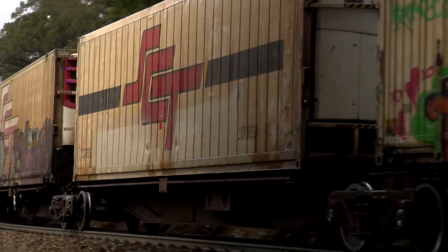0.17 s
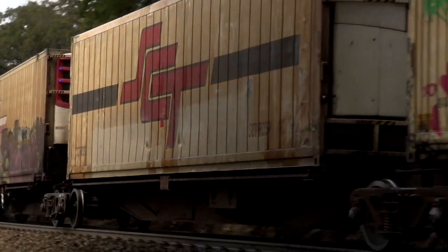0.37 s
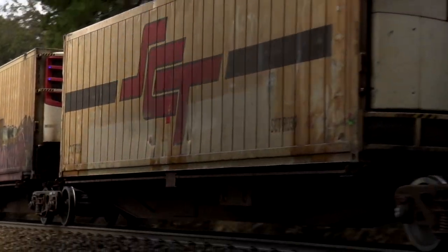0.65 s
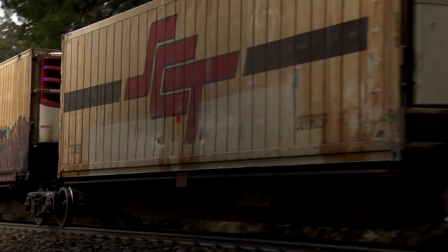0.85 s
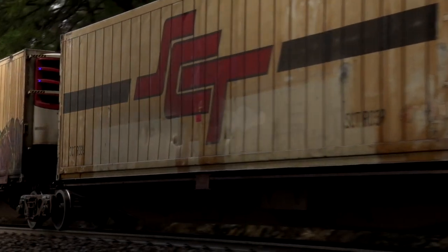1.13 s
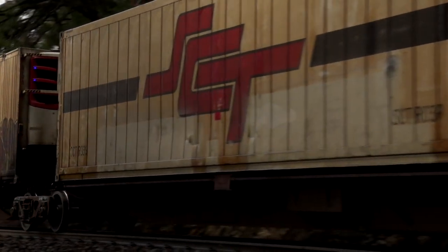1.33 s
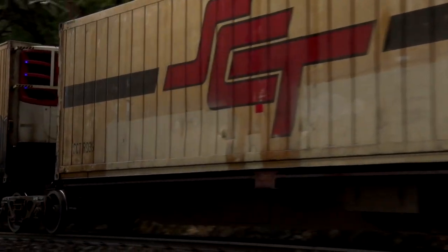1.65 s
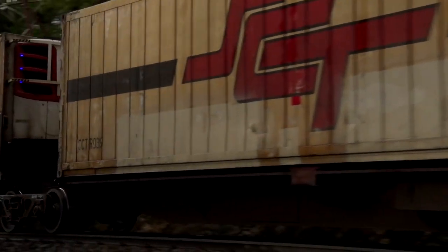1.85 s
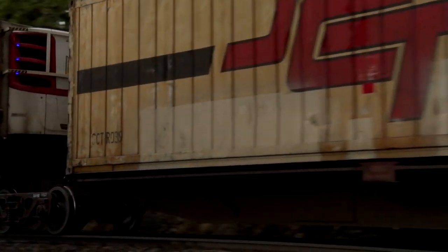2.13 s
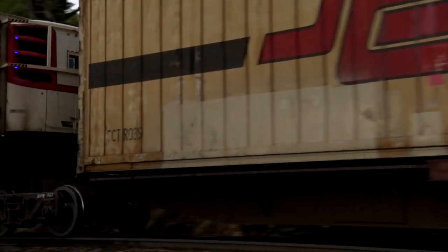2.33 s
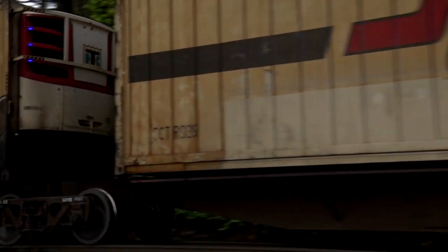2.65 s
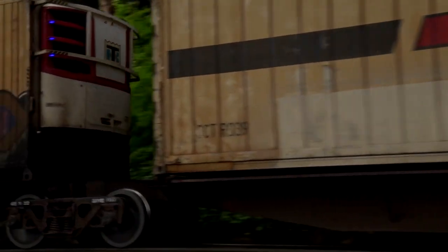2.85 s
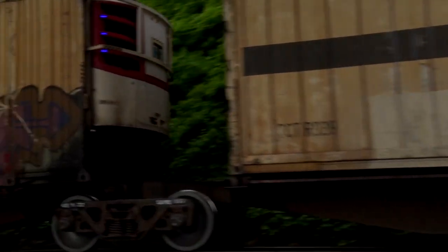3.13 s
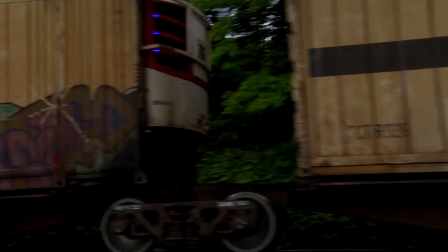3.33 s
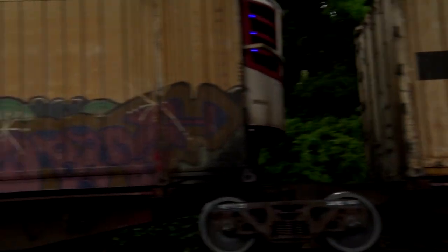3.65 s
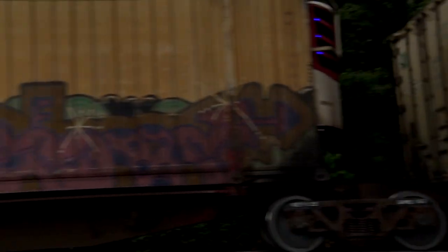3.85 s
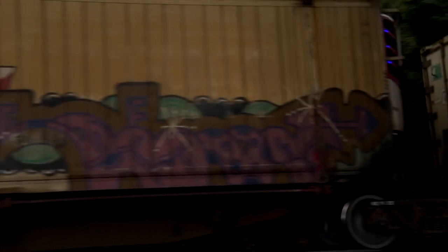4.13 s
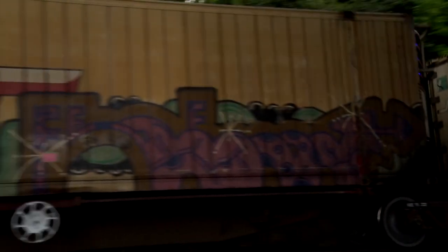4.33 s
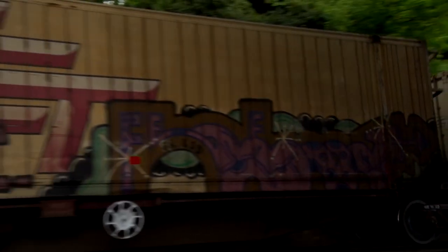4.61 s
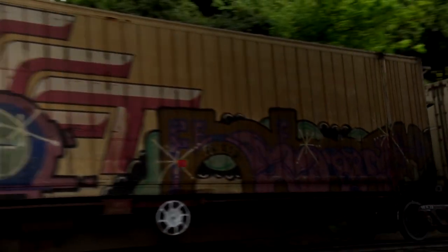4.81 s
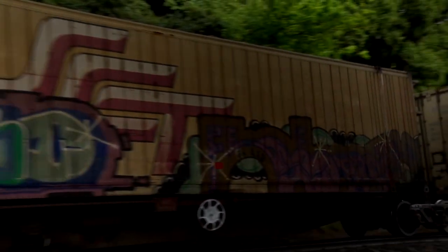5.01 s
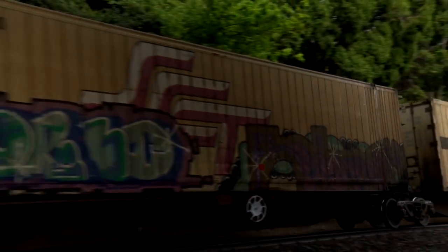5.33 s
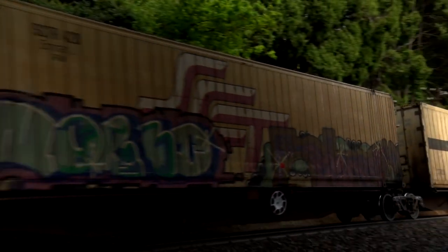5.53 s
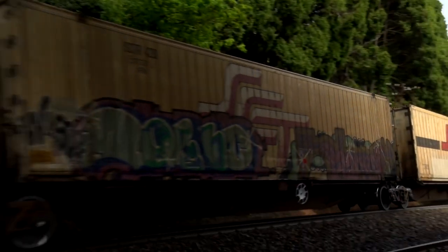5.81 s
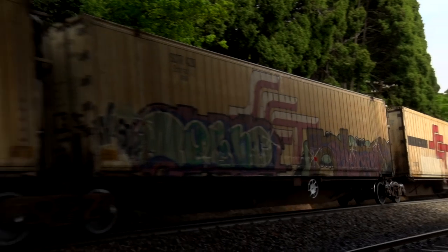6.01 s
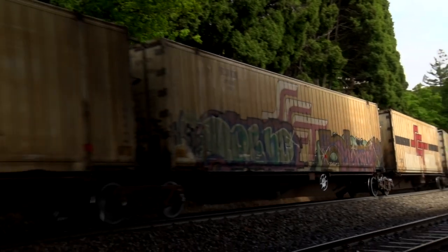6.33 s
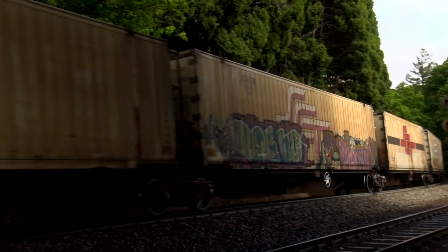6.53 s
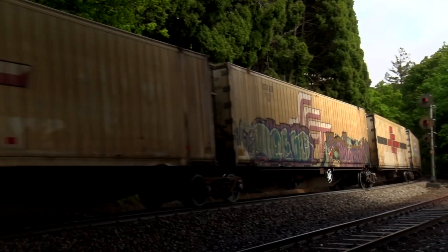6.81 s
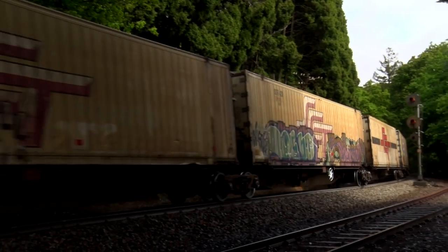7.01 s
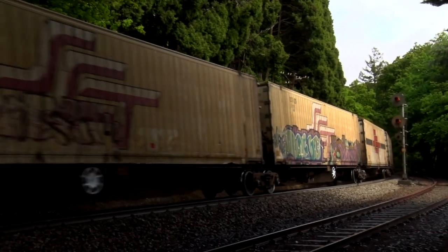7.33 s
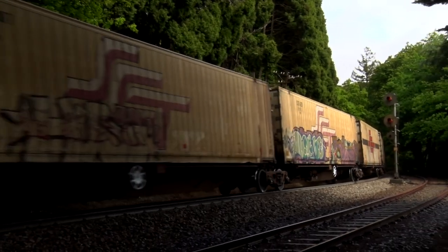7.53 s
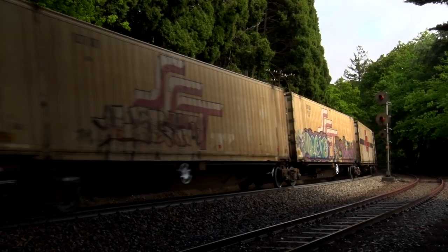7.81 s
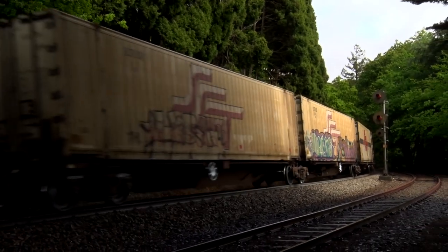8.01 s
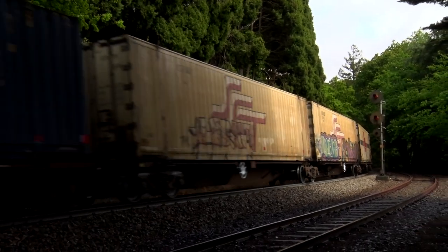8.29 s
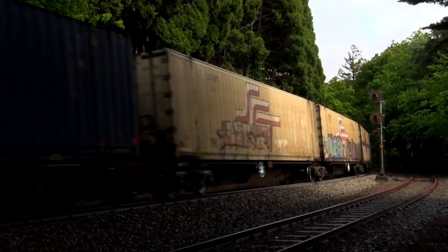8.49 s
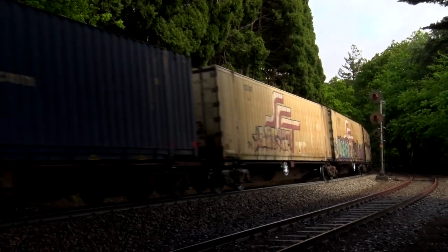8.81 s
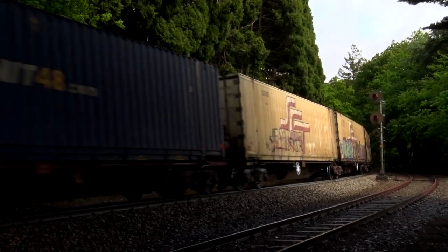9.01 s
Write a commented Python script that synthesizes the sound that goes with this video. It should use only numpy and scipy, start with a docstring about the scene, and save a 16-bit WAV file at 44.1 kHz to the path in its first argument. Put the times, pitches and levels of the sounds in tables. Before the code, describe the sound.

Piercing metallic wheel squeal from freight wagons rounding a curve, over scraping flange hiss and low rumble, fading to quieter rolling with joint knocks.

```python
"""A piercing squeal is heard first: freight wagons roll round a curve and single wheels lock into stick-slip.
Each long squeal is a fluttering sine on one wheel mode, sinking by the Doppler effect as the wheel goes by.
Behind it, shaped noise gives scraping flanges, ringing wheel modes, echoes and track rumble; brief squeaks are
swelling sines. Late on, decaying sines and noise make wheels knock on a joint, and a wagon frame groans.
The loudest squeal overloads the input of the two-microphone recorder."""
import sys
import numpy as np
from scipy import signal
from scipy.fft import rfft, irfft, next_fast_len
from scipy.io import wavfile
from scipy.ndimage import uniform_filter1d, map_coordinates

SR = 44100
rng = np.random.default_rng(int(sys.argv[2]) if len(sys.argv) > 2 else 0)


def generate_wav(signal):
    """Clip the signal to [-1, 1] and save it as 16-bit WAV at the path in sys.argv[1]."""
    frames = np.transpose(np.atleast_2d(signal))
    scaled = np.clip(frames, -1, 1) * 32767
    pcm = np.round(scaled).astype(np.int16)
    wavfile.write(sys.argv[1], SR, pcm)


N = 403515
T = np.arange(N) / SR  # time [s]
SPEED, SOUND_SPEED = 9.26, 343  # train and sound [m/s]
BOGIE_DISTANCE = 11.1  # nearest distance of the bogies to the microphones [m]

# Track and wagon rumble, and tread roar: (time [s], rumble level [dB], roar level [dB]), before fixed trims
ROLLING_LEVELS = [(0, -35.5, -41.5), (3.5, -36.5, -40.5), (3.8, -39.5, -41), (7.16, -40.5, -47.5),
                  (8.31, -38, -47), (9.15, -37, -44.5)]
# Spectrum of the rumble: (frequency [Hz], relative level [dB])
RUMBLE_SPECTRUM = [(12, -45), (20, -21), (32, -2.5), (65, -7), (82, -1), (97, 0.5), (183, -3.5), (227, -11),
                   (263, -14.5), (350, -32), (460, -42), (770, -120)]
# Spectrum of the roar: (frequency [Hz], relative level [dB])
ROAR_SPECTRUM = [(140, -38), (230, -2.5), (259, -17), (317, -7), (752, -4.5), (1200, -3.5), (1500, -15),
                 (1950, -36), (3300, -120)]
# Low steel tone: (time [s], level [dB])
STEEL_TONE_LEVELS = [(0, -46), (1.65, -51), (2.65, -40), (5.5, -49), (6.4, -45), (6.8, -55), (7.2, -47),
                     (7.65, -55), (8.5, -48), (9.15, -58)]
# Flange noise, before fixed trims:
# (time [s], level [dB], low part relative to it [dB], high part relative to it [dB])
GRINDING_LEVELS = [(0, -33, -0.5, -5), (2.8, -31, .5, -1.5), (3.26, -27, -3, -3), (4.53, -28, -4.5, -4),
                   (5.12, -32.5, -1.5, -8), (5.61, -28.5, -1.5, -12), (6.96, -32.5, -4, -7.5),
                   (7.3, -36, -1.5, -10.5), (8.66, -39, 0, -5), (9.15, -37.5, -2.5, -10)]
# Spectrum of the flange noise: (frequency [Hz], relative level per Hz [dB])
HISS_SPECTRUM = [(530, -42), (900, -15), (1560, -6.5), (2530, -1.5), (2960, -6.5), (3260, -8.5),
                 (3900, -7.5), (6610, -7.5), (9370, -11.5), (10800, -15.5), (11800, -22.5), (14100, -28),
                 (15900, -23.5)]
# Bogies going by: (moment of passing [s], relative level [dB], wheel tuning [ratio])
BOGIES = [(.2, 3.5, 1.0), (1.9, 1.5, .995), (3.5, 4.5, 1.005), (5.3, 2, .998), (7.2, 2, 1.002),
          (9, -4, .996)]
# Resonances of the wheels: (frequency [Hz], width [Hz], relative level [dB])
WHEEL_MODES = [(1812, 63, -7.5), (2162, 43, -6.5), (2618, 37, -6.5), (4360, 83, -6), (5045, 55, -3.5),
               (5500, 85, -4), (6010, 33, -9), (6645, 94, -2), (7770, 163, -1), (8860, 102, -2),
               (9900, 68, -4), (10900, 65, 0), (13400, 120, -8), (14250, 200, -13)]
# Ringing of all bogies together, before a fixed trim: (time [s], level [dB])
RINGING_LEVELS = [(0, -26.5), (1.65, -27), (2.6, -29.5), (3.4, -24.5), (4, -24.5), (4.64, -29.5),
                  (6.86, -35.5), (7.26, -31.5), (7.39, -39.5), (9.15, -39)]
# Broader, wavering noise band just above the low squeal: (time [s], level [dB])
WAVERING_BAND_LEVELS = [(0, -26), (1.2, -21.5), (2, -41), (3, -33.5), (4.6, -35.5), (5.8, -31.5),
                        (7, -39.5), (8, -42), (9.15, -48)]
# Squeals scattered back by wagons and trees: (time [s], low mode level [dB], high mode level [dB])
SCATTER_LEVELS = [(0, -16.5, -28), (.5, -14, -27), (1.45, -10.5, -29.5), (1.6, -12.5, -30.5),
                  (2.2, -18.5, -23), (2.8, -20, -25.5), (3.2, -29, -24.5), (3.6, -27.5, -28),
                  (5.2, -36, -34.5), (6, -35, -34), (7.2, -35.5, -42), (9.15, -37, -51)]
# Wheels on a joint: (time [s], level of the whole knock [dB], thud relative to it [dB])
KNOCKS = [(7.973, -30, 2), (8.598, -33, 7), (8.9, -39, 6), (9.056, -39, -11)]
# Resonances of the joint: (frequency [Hz], relative level [dB], 60 dB decay time [s])
JOINT_MODES = [(447.5, -9, 0.27), (552, -2.5, 0.22), (777, -5, .2), (1195, 1.5, 0.41), (1770, -1, .2)]
# Brief squeaks: (start time [s], length [s], middle frequency [Hz], level [dB], left over right [dB])
SQUEAKS = [(0, 0.99, 7680, -25.5, -3), (0, 1.12, 7800, -27.5, 0), (.7, .58, 2225, -37.5, -8),
           (.71, 0.66, 5530, -38, 0), (2.16, 0.31, 9870, -32, -10), (2.99, 0.48, 5500, -26, 2),
           (3.07, .58, 13085, -42, 1), (3.22, 0.62, 9998, -32, 3), (3.23, .87, 9010, -30.5, 0),
           (3.34, 0.43, 2605, -38, 3), (3.34, .81, 6700, -39, 3), (3.5, .37, 6020, -40, 2),
           (3.8, .22, 5140, -32, -1), (3.75, 0.3, 5500, -36, 0), (3.9, 0.23, 6835, -31, 10),
           (4.14, .34, 8858, -35, 3), (4.45, 0.32, 7910, -33, 9), (4.66, 0.75, 10050, -30, 2),
           (4.74, 0.24, 2620, -35, 9), (4.83, 0.44, 8977, -36, 0), (5, 0.47, 2620, -37, 12),
           (5.32, .77, 7558, -37, 8), (5.32, 0.91, 6645, -38, 13), (5.47, .34, 6000, -39, 8),
           (5.48, .43, 5470, -38, 14), (5.54, .37, 8845, -40, 8), (5.6, 0.18, 4180, -39, 0),
           (6.92, 0.47, 7700, -26.5, 0), (6.75, .66, 6630, -38, 3), (6.89, .54, 14360, -41, 5),
           (7.1, .55, 9800, -42, 4), (7.5, .2, 4550, -41, 1), (8.64, 0.3, 2146, -41.5, 6),
           (8.8, .15, 4290, -40, -4), (9.02, .22, 2185, -37.5, 4)]
# Long-squealing wheels: (moment of passing [s], mode frequency [Hz], nearest distance [m])
WHEELS = [(1.87, 3222, 11.1), (.28, 10935, 11.1), (2.03, 10928, 11.1), (3.59, 11044, 9.26),
          (3.56, 10938, 11.1), (5.34, 10941, 11.1), (3.76, 7834, 11.1)]
# Unsteadiness of each of these wheels: (flutter [0-1])
FLUTTER = [0.37, 0.39, 0.61, .45, 0.34, 0.29, .55]
# Course of each wheel's squeal between lock-ins:
# (time [s], level [dB], left over right [dB], left phase lead [rad])
SQUEAL_COURSES = [
    [(0, -10, 2, 0), (.15, -13, 0.5, 0), (.55, -9.5, 1, 0.5), (.75, -13, 1, .5), (1.1, -13.5, -6, 0.75),
     (1.65, -13, -6, 1.36), (1.8, -15.5, -6.5, 4.5), (2.3, -15, -1, 3.5), (2.45, -10, -0.5, 3.5),
     (2.8, -12, 1, 3.5), (3.25, -25, -0.5, 3.5), (3.8, -22.5, -4, 4), (4.1, -32.5, -6.5, 3.5),
     (5.18, -34, -8, 4.5)],
    [(0, -19, 5, -2), (.6, -25, 2, -4), (1.1, -36, -3, -3), (1.55, -36, 10, -2.7), (2.55, -35, 4, -4)],
    [(.8, -40, 2, 3), (1.5, -34, 8, 0), (1.9, -23, 7, -1.7), (2.2, -27, -1, -4), (3.4, -31, 6, -4.5),
     (4.54, -37, 2, -3.5)],
    [(1.8, -36, 0, -.1), (2.4, -34, 0, -.1), (2.95, -33, 0, -.1), (3.35, -22.5, 1, -.1),
     (4.01, -35, 5, -.1)],
    [(1.7, -38, 1, -.2), (2.55, -31, 1, -.1), (2.8, -25.5, 1, -.1), (3.05, -25.5, 1, -.1),
     (3.3, -16.5, 2, -.1), (3.6, -28, 4, -.1), (4.25, -37, 5, 0)],
    [(4.5, -37, -6, 2.6), (5.05, -32.5, 3, 3.6), (5.4, -35, -2, 5.8), (5.7, -38, 0, 6.2), (7, -43, 1, 6.2),
     (8.75, -51, 10, 6.2)],
    [(2.1, -29.5, -3, 0), (2.7, -45, -3, 0), (3.2, -24.5, -1, 0), (3.65, -36, 2, 0), (4, -31, 3, 0),
     (4.48, -37, 1, 0)],
]
# Moments when each wheel locks in: (start time [s], length [s], rise [dB], shift to the left [dB])
LOCK_INS = [
    [(0, .1, 4, 2), (.27, .09, 2.5, 1), (.42, 0.25, 3, -1), (.85, .07, 5, 3), (.96, 0.074, 5, -4),
     (1.14, 0.086, 10, 2.5), (1.27, 0.13, 9.5, 1), (1.41, 0.063, 10.5, -1), (1.54, .09, 14.5, 2),
     (1.63, 0.085, 13.5, -5), (1.8, .045, 6.5, -0.5), (1.87, 0.047, 5, -4), (1.99, .04, 11, -2),
     (2.04, .08, 15, 2), (2.12, 0.081, 8.5, 0), (4.25, 0.18, 4.5, -4), (4.58, .2, 6, -5)],
    [],
    [],
    [],
    [(3.342, 0.14, 7.5, 0)],
    [(5.133, 0.142, 13.5, -0.5)],
    [],
]
# Likeness of left and right in the noise: (frequency [Hz], correlation [-1 to 1])
ALIKENESS = [(60, 0.73), (300, 0.57), (1400, 0.42), (3200, 0.39), (7000, 0.27), (15000, 0.47)]
# Drawing of the noise to the stereo centre: (time [s], share below 7 kHz [0-1], share above [0-1])
NARROWING = [(0, 0.13, 0), (2.8, 0.14, 0.07), (3.2, 0.76, .8), (3.6, 1, 1), (4.4, 1, 1), (4.8, .2, 0.2),
             (5.2, .05, .1), (6, 0.4, .4), (7, 0.12, 0), (7.6, 1, 0.24), (8.4, 0.7, .19), (9.15, 0.9, .25)]
# Change of the left-right difference at full narrowing: (frequency [Hz], gain [dB])
SIDE_GAIN = [(300, 1), (2500, -5), (3700, -7), (4600, -59), (5500, -31), (6500, -12), (7700, -10),
             (8800, -17), (9900, -14), (10800, -8), (12000, -32), (13300, -49), (15000, -70)]


def amp(db):
    """Logarithmic level: decibels to amplitude gain."""
    return 10 ** (np.asarray(db) / 20)


def unit(x):
    """Power normalisation: scales a signal to rms 1."""
    return x / np.sqrt(np.mean(abs(x) ** 2) + 1e-20)


def along(points, hz):
    """Logarithmic frequency scale: interpolates (frequency [Hz], value) points."""
    f, v = np.transpose(points)
    return np.interp(np.log(hz + 1), np.log(f + 1), v)


def curves(rows):
    """Linear interpolation: one value per sample for each column after the time."""
    s, *columns = np.transpose(rows)
    return [np.interp(T, s, column) for column in columns]


def wobble(rate, size=N):
    """Slow random fluctuation: straight lines between normal draws, `rate` knots a second."""
    knots = rng.standard_normal(int(size * rate / SR) + 2)
    return np.interp(T[:size] * rate, np.arange(len(knots)), knots)


def filtered(x, response):
    """Linear filtering: multiplies the spectrum by a response of frequency."""
    m = next_fast_len(x.shape[-1] + 8192)
    hz = np.fft.rfftfreq(m, 1 / SR)
    return irfft(rfft(x, m) * response(hz), m)[..., :x.shape[-1]]


def rush(gain, size=N):
    """Partial coherence: stereo noise of rms 1, shaped by a gain over frequency."""
    def mid_side_gain(hz):
        angle = np.arccos(np.clip(along(ALIKENESS, hz), -1, 1)) / 2
        return gain(hz) * [np.cos(angle), np.sin(angle)]

    mid, side = filtered(rng.standard_normal((2, size)), mid_side_gain)
    return unit(np.array([mid + side, mid - side]))


def band(centre_hz, half_width_hz, order=4):
    """Band-pass response: near 1 around the centre, one half at the half width."""
    return lambda hz: 1 / (1 + ((hz - centre_hz) / half_width_hz) ** order)


def doppler(passing, distance):
    """Doppler effect: pitch ratio and distance [m] of a wheel passing at the given moment."""
    x = SPEED * (T - passing)
    r = np.hypot(x, distance)
    return 1 / (1 + SPEED / SOUND_SPEED * x / r), r


def tone(hz, rough, rate):
    """Random modulation: a complex sine, nominal rms 1 in its real part, fluttering in size and phase."""
    flutter = 1 + rough * (wobble(rate, size=len(hz)) + 1j * wobble(rate, size=len(hz)))
    scale = np.sqrt(2 / (1 + 4 / 3 * rough ** 2))  # offsets the power added by the flutter
    cycles = np.cumsum(hz) / SR + rng.random()
    return scale * flutter * np.exp(2j * np.pi * cycles)


def gate(rows):
    """Time windowing: open while a table lasts, with 32 ms fades outside it."""
    return np.clip(np.minimum(T - rows[0][0], rows[-1][0] - T) / 0.032 + 1, 0, 1)


def rolling():
    """Rolling contact: broadband rumble of wagons and track bed, roar of treads, and a low steel tone."""
    rumble_db, roar_db = curves(ROLLING_LEVELS)
    rumble = amp(rumble_db + 1.0) * rush(lambda hz: amp(along(RUMBLE_SPECTRUM, hz)))
    roar = amp(roar_db + 2.5) * rush(lambda hz: amp(along(ROAR_SPECTRUM, hz)))
    steel_tone = tone(np.full(N, 1216), rough=1.4, rate=60).real
    return rumble + roar + amp(curves(STEEL_TONE_LEVELS)[0]) * steel_tone


def grinding():
    """Friction noise: flanges scrape the rail as broad hiss in three parts, swelling together with slip."""
    db, low_db, high_db = curves(GRINDING_LEVELS)
    slip_db = 1.17 * wobble(14)

    # power shares of the low and high parts; the body takes the rest
    lower = lambda hz: 1 / (1 + (hz / 3300) ** 6)
    upper = lambda hz: 1 / (1 + (11400 / (hz + 1)) ** 16)
    middle = lambda hz: abs(1 - lower(hz) - upper(hz))

    def part(share):
        return rush(lambda hz: amp(along(HISS_SPECTRUM, hz)) * np.sqrt(share(hz)))

    body = amp(db + 4 + slip_db) * part(middle)
    growl = amp(db + low_db + 0.5 + 1.2 * slip_db) * part(lower)
    sizzle = amp(db + high_db + 5.5 + slip_db) * part(upper)
    return body + growl + sizzle


def ringing():
    """Modal resonance: noise rings each bogie's wheel modes, which sink by the Doppler effect as it passes."""
    def modes(hz):
        power_response = sum(amp(2 * db) / (1 + ((hz - centre) / width * 2) ** 2) ** 2
                             for centre, width, db in WHEEL_MODES)
        return np.sqrt(power_response)

    out, power = np.zeros((2, N)), np.zeros(N)
    for passing, db, tuning in BOGIES:
        ratio, r = doppler(passing, BOGIE_DISTANCE)
        nearness = amp(db + 2.7 * wobble(5)) * BOGIE_DISTANCE / r
        emitted = rush(modes, size=N + SR)
        place = np.cumsum(ratio * tuning)  # reading position in samples: its pace sets the pitch
        out += nearness * np.array([map_coordinates(channel, [place], order=3) for channel in emitted])
        power += nearness ** 2
    # the bogies share one overall level course
    return amp(curves(RINGING_LEVELS)[0] + 3.5) * out / np.sqrt(power)


def wavering_band():
    """Band-limited noise: a broader band just above the low squeal, its level wavering at random."""
    return amp(curves(WAVERING_BAND_LEVELS)[0] + 3.0 * wobble(10)) * rush(band(3340, 150))


def scatter():
    """Scattering: echoes from moving wagons and trees smear the squeals into a low and a high noise band."""
    low_db, high_db = curves(SCATTER_LEVELS)
    # the low band sinks once its wheel passes, by an equal-power crossfade
    early, late = rush(band(3243, 85)), rush(band(3200, 85))
    turn = np.interp(T, [1.8, 2.3], [0, np.pi / 2])
    low = np.cos(turn) * early + np.sin(turn) * late
    high = rush(band(10950, 290, order=6))
    return amp(low_db + 1.24 * wobble(12)) * low + amp(high_db + wobble(11)) * high


def groan():
    """Transient excitation: a wagon frame groans as a low noise band, sudden in onset and then decaying."""
    since = T - 9.05  # time from the onset [s]
    attack = np.clip(since / .008, 0, 1)
    decay = amp(-30 * np.clip(since, 0, 1))
    return amp(-39) * attack * decay * rush(band(500, 150))


def knocks():
    """Impact excitation: a wheel drops on a joint and damped steel modes ring over a dull thud."""
    out, t = np.zeros(N + SR), T[:SR // 2]
    attack = 1 - np.exp(-t / 0.0021)
    for s, db, thud_db in KNOCKS:
        # each mode is struck with a random level, 3 dB standard deviation
        ring = sum(amp(level + rng.normal(0, 3) - 60 * t / t60) * np.sin(2 * np.pi * hz * t)
                   for hz, level, t60 in JOINT_MODES)
        thud = amp(thud_db - 60 * t / 0.15) * np.sin(2 * np.pi * 120 * t)
        dull_noise = unit(filtered(rng.standard_normal(len(t)), lambda hz: 1 / (1 + (hz / 900) ** 4)))
        clunk = amp(-60 * t / .12) * dull_noise / 2
        out[round(s * SR):][:len(t)] += amp(db) * (amp(-7.5) * ring + thud + clunk) * attack
    return out[:N]


def squeaks():
    """Short-lived stick-slip: a mode catches for a moment, swells, sags a little and lets go."""
    sag_per_s = .012  # share of its pitch lost each second
    lead_spread = 2.3  # standard deviation of the left phase lead [rad]
    out = np.zeros((2, N + 2 * SR))
    side = np.array([[.5], [-.5]])  # left, right
    for s, length, hz, db, pan_db in SQUEAKS:
        u = np.linspace(0, 1, round(length * SR))
        swell = np.sin(np.pi * u ** 0.9) ** 0.5
        z = tone(hz * (1 - sag_per_s * length * (u - .5)), rough=0.9, rate=50) * swell
        turned = z * np.exp(1j * rng.normal(0, lead_spread) * side)
        start = round(s * SR)
        out[:, start:start + len(u)] += (amp(db + pan_db * side) * turned).real
    return out[:, :N]


def singing(rows, locks):
    """Frictional lock-in: left and right level [dB] and phase lead [rad], a slow course plus each rise."""
    rise_s, fall_s = .012, .016
    db, pan_db, lead = curves(rows)
    for s, length, rise_db, shift_db in locks:
        held = np.clip(np.minimum((T - s) / rise_s, (s + length - T) / fall_s) + .5, 0, 1)
        db = db + rise_db * held
        pan_db = pan_db + shift_db * held
    return db + pan_db / 2, db - pan_db / 2, lead


def squeals():
    """Stick-slip: friction holds one mode of each wheel, its pitch following the Doppler effect."""
    out = np.zeros((2, N))
    for (passing, hz, distance), rough, rows, locks in zip(WHEELS, FLUTTER, SQUEAL_COURSES, LOCK_INS):
        left_db, right_db, lead = singing(rows, locks)
        # a strong squeal locks in and steadies
        loose = np.clip((2.0 - np.maximum(left_db, right_db)) / 16, .1, 1)
        ratio, _ = doppler(passing, distance)
        z = tone(hz * ratio, rough * loose, rate=50) * gate(rows) * amp(2.8 * loose * wobble(18))
        pair = amp([left_db, right_db]) * z * np.exp(.5j * np.array([lead, -lead]))
        octave = pair ** 2 / (1 + abs(pair))  # uneven slip adds a weak octave
        out += pair.real + amp(-22.5) * octave.real
    return out


def patchy(x, patchy_db):
    """Time-frequency modulation: random patches of gain, and a stereo width that changes with time."""
    mid_side = np.array([x[0] + x[1], x[0] - x[1]]) / 2
    hz, t, (mid, side) = signal.stft(mid_side, SR, nperseg=512)
    field = rng.standard_normal(mid.shape)
    field = uniform_filter1d(field, size=3, axis=0)  # smooth over frequency
    field = uniform_filter1d(field, size=24, axis=1)  # smooth over time
    s, lower, upper = np.transpose(NARROWING)
    share = np.where(hz[:, None] < 7000, np.interp(t, s, lower), np.interp(t, s, upper))
    side = side * amp(along(SIDE_GAIN, hz)[:, None] * np.clip(share, 0, 1))
    stereo = np.array([mid + side, mid - side]) * amp(patchy_db * unit(field))
    return signal.istft(stereo, SR, nperseg=512)[1][:, :N]


def scene():
    """Superposition: all sources add at the two microphones."""
    noise = patchy(squeaks() + ringing() + grinding() + rolling(), patchy_db=1.5)
    return squeals() + scatter() + wavering_band() + noise + knocks() + groan()


def record(dry):
    """Saturation and band limiting: the input overloads on the loudest squeal; deep bass and top are cut."""
    clipped = dry / (1 + abs(dry / 0.81) ** 5) ** (1 / 5)
    return filtered(clipped, lambda hz: (hz < 15800) / np.sqrt(1 + (34 / (hz + 1)) ** 6))


dry = scene()
out = record(dry)
generate_wav(out)
```